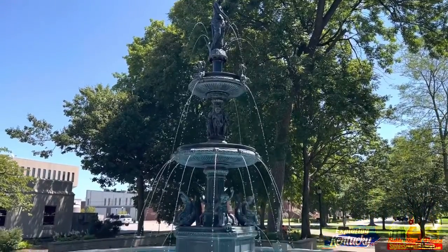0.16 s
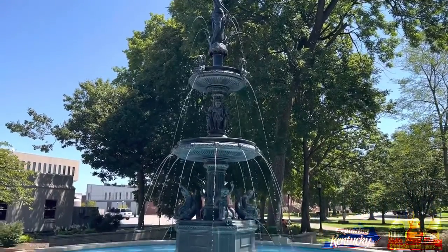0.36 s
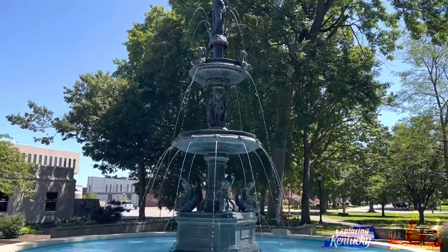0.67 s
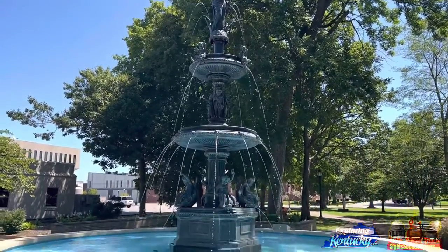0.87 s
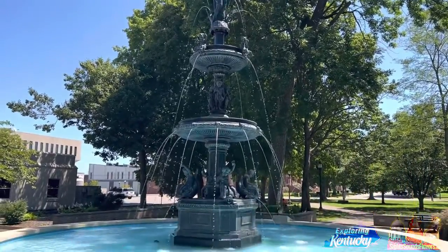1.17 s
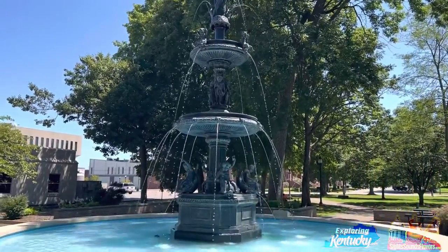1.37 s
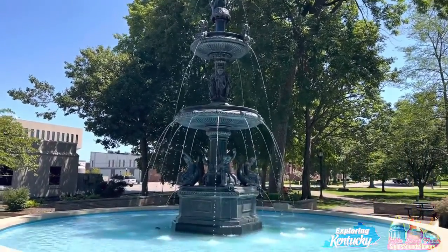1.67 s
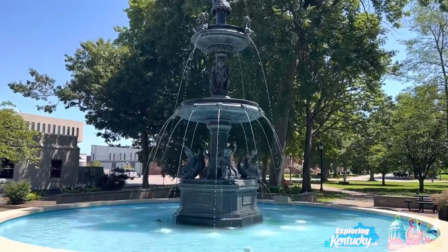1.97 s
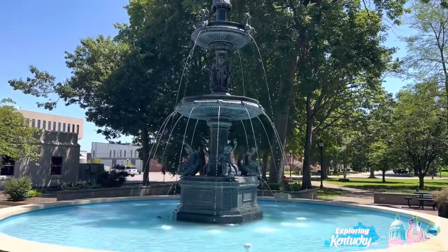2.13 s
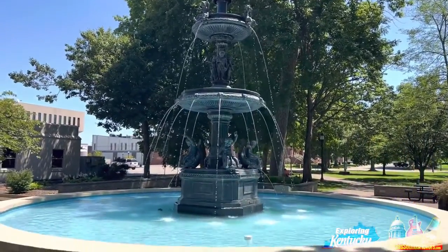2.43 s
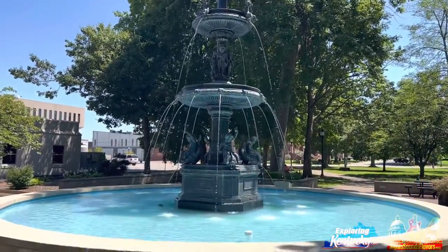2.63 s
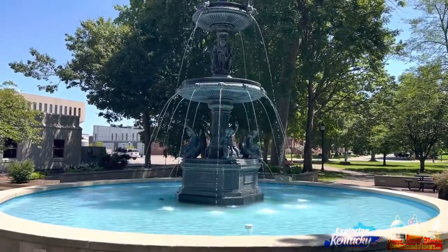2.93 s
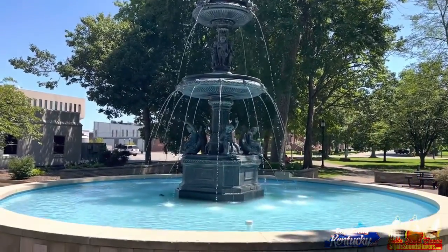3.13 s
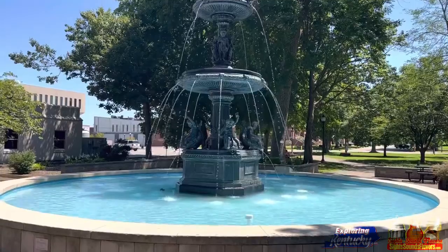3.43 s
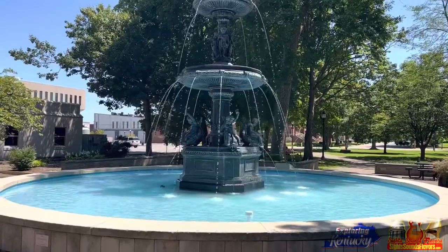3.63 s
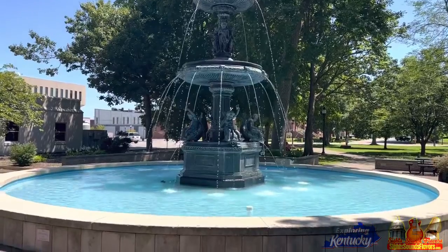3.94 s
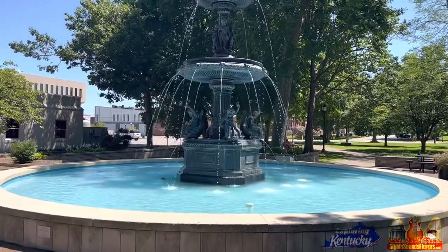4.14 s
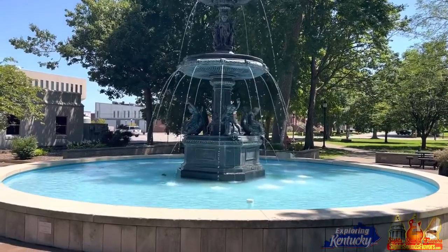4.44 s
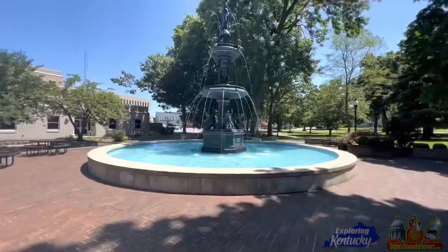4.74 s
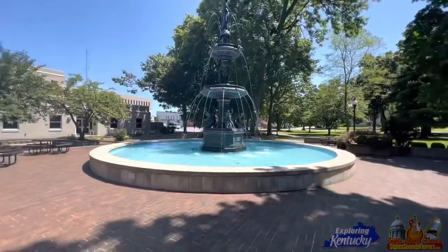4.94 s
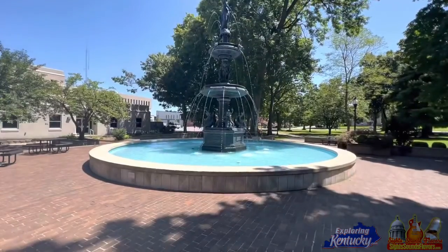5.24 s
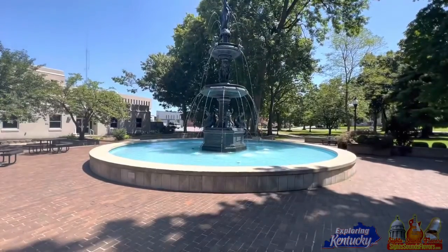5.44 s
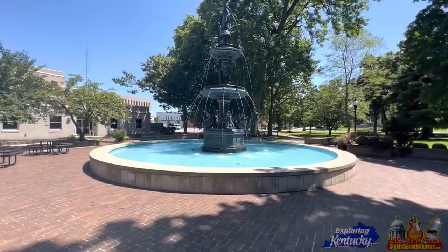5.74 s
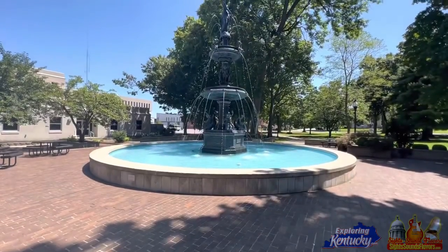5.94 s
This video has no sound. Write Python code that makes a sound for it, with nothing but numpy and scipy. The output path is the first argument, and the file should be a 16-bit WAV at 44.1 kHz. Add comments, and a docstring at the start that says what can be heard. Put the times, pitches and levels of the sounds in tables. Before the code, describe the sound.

Thin fountain jets splash steadily into a pool, with plops and droplet patter, over a low traffic rumble and a distant engine drone.

```python
"""A park with a tiered fountain, on two microphones: first at the rim, then farther back on the brick plaza.
Thin jets break into slugs that slap into the pool: noise ticks, ringing bubbles and a noise wash.
Single slaps, droplet showers and clumps of water stand out, each built from noise or damped sines.
Filtered noise rumbles as street traffic, an engine and then a fainter motor drone as sine tones,
and a bird chips once, a swept whistle with a short echo."""
import sys
import numpy as np
from scipy import signal
from scipy.fft import rfft, irfft, next_fast_len
from scipy.io import wavfile
from scipy.ndimage import uniform_filter1d, map_coordinates

SR = 44100
rng = np.random.default_rng(int(sys.argv[2]) if len(sys.argv) > 2 else 0)


def materialize(psi):
    """Save the field psi as 16-bit PCM at rate SR to the path in sys.argv[1].

    A 1-D psi becomes a single channel; in a 2-D psi each row is a channel.
    """
    bounded = np.clip(np.atleast_2d(psi).T, -1, 1)
    quanta = np.round(bounded * 32767).astype(np.int16)
    wavfile.write(sys.argv[1], SR, quanta)


N = 269010


def amp(db):
    """Decibels to gain."""
    return 10 ** (np.asarray(db) / 20)


def unit(x):
    """Scale to rms 1."""
    return x / np.sqrt(np.mean(x ** 2) + 1e-20)


def along(points, hz):
    """Each column of a table by frequency, read on a log axis."""
    f, *cols = np.transpose(points)
    return [np.interp(np.log(hz + 1), np.log(f + 1), c) for c in cols]


def curves(rows):
    """One value per sample for each column after the time."""
    s, *cols = np.transpose(rows)
    return [np.interp(np.arange(N) / SR, s, c) for c in cols]


def wobble(rate):
    """A smooth random curve of rms 1, with rate knots a second."""
    knots = rng.standard_normal(int(N * rate / SR) + 4)
    return unit(map_coordinates(knots, [np.arange(N) * rate / SR]))


def swell(full_s, leave_s, rise_db_per_s, fall_db_per_s):
    """Attack, hold and release, in dB below the held level."""
    t = np.arange(N) / SR
    return -rise_db_per_s * np.maximum(full_s - t, 0) - fall_db_per_s * np.maximum(t - leave_s, 0)


def filtered(x, response):
    """x times a complex response of frequency."""
    m = next_fast_len(N + SR // 4)
    return irfft(rfft(x, m) * response(np.fft.rfftfreq(m, 1 / SR)), m)[..., :N]


def above(hz, edge_hz):
    """Gain of a gentle high-pass."""
    return hz ** 2 / np.sqrt(hz ** 4 + edge_hz ** 4)


def place(times, grains):
    """Sum rows of grains, each starting at its time in seconds."""
    start = (np.asarray(times) * SR).astype(int)[:, None] % N
    index = start + np.arange(grains.shape[1])
    return np.bincount(index.ravel(), grains.ravel(), N)[:N]


def to_both(x, left_db):
    """Left and right microphone, one raised and the other lowered by left_db."""
    return amp([[left_db], [-left_db]]) * x


def impacts(times, sizes, life_s):
    """Each drop is a sharp noise tick that dies within a millisecond or so."""
    t = np.arange(SR // 400) / SR
    ticks = rng.standard_normal((len(times), len(t))) * np.exp(-t / life_s)
    return unit(place(times, sizes[:, None] * ticks))


def bubbles(times, sizes, centre_hz, spread, cycles, rise):
    """Trapped air rings briefly, and its pitch climbs as it nears the surface."""
    t = np.arange(SR // 40) / SR
    chance = rng.standard_normal((len(times), 2))
    hz = centre_hz * np.exp(spread * 2 * np.tanh(chance[:, :1] / 2))
    life = np.minimum(cycles * np.exp(.5 * chance[:, 1:]) / hz, t[-1] / 4)
    phase = 2 * np.pi * hz * (t + rise * t ** 2 / (2 * life))
    rings = np.sqrt(hz / life) * np.sin(phase) * np.exp(-t / life)
    return unit(place(times, sizes[:, None] * rings))


def patchy(x, depth_db, size):
    """Random swells a few hundred Hz wide and some 30 ms long, as single jets waver."""
    z = signal.stft(x, nperseg=512, noverlap=384)[2]
    field = rng.standard_normal(z.shape)
    for axis in (0, 1):  # smooth over frequency bins, then over time frames
        field = uniform_filter1d(field, size[axis], axis=axis)
    return signal.istft(z * amp(depth_db * unit(field)), nperseg=512, noverlap=384)[1][:N]


def splashing(count=1800, slug_db=2.5, drop_db=4.0, scatter_s=.003):
    """Slugs land at random; each breaks into a clump of drops and bubbles over the wash of distant ones."""
    # the pump's steady flow keeps the count even
    slug_s = (np.arange(count) + rng.uniform(-2, 2, count)) * N / SR / count
    slug = amp(slug_db * np.minimum(rng.standard_normal(count), 2))

    def fragments(size):
        """Times and gains of the pieces that each slug breaks into."""
        times = np.repeat(slug_s, size) + scatter_s * rng.exponential(1, count * size)
        gains = amp(drop_db * np.minimum(rng.standard_normal(count * size), 2))
        return times, np.repeat(slug, size) * gains

    ticks = impacts(*fragments(size=4), life_s=0.00056)
    ticks = filtered(ticks, lambda hz: .5 + .5 * above(hz, 1030))  # small drops carry little bass
    plops = bubbles(*fragments(size=2), centre_hz=1183, spread=0.467, cycles=1.93, rise=0.061)
    rings = bubbles(*fragments(size=3), centre_hz=3200, spread=.8, cycles=10, rise=.02)
    wash = unit(rng.standard_normal(N) * amp(0.78 * wobble(90)))
    water = amp(-5) * ticks + amp(-7.5) * rings + amp(-12) * plops + amp(2) * wash
    return patchy(water, depth_db=.9, size=(5, 11))


def heard_from(fields, colour, image, bounce_s, bounce_db=-15):
    """Two unrelated sheets of splashing, coloured, shared between the microphones and echoed by a surface."""
    def weights(hz):
        """Gain of each sheet (second axis) into each microphone (first axis)."""
        balance_db, alike, lead = along(image, hz)
        turn = np.arccos(np.clip(alike, -1, 1)) / 2  # mixing angle that gives this likeness
        mics = np.array([amp(balance_db / 2), amp(-balance_db / 2) * np.exp(-1j * lead)])
        reflected = amp(bounce_db) * above(hz, 2000) / (1 + (hz / 8000) ** 8)
        comb = 1 + reflected * np.exp(-2j * np.pi * np.outer(bounce_s, hz))
        mics = colour(hz) * comb * mics / np.linalg.norm(mics, axis=0)
        mix = np.array([[np.cos(turn), np.sin(turn)], [np.cos(turn), -np.sin(turn)]])
        return mics[:, None] * mix

    pair = filtered(fields, weights).sum(axis=1)
    return pair / np.std(pair.mean(axis=0))


# Colour of the falling water from each place.
# Each row: frequency in Hz, relative level in dB at the rim, relative level in dB from the plaza.
WATER_COLOUR = [(25, -31, -35), (89.5, -4, -9), (254, -3.5, -3.5), (375, -5, -8), (477, -5, -6),
                (638, -1.5, -0.9), (777, -0.1, 0), (840, -5.5, -9.5), (1120, -1.5, -0.5), (1292, -4.5, 1),
                (1350, -7, -8), (1520, -4, -8), (1684, -1.6, 3), (1860, -5.5, -5), (2120, -1.6, -3),
                (2410, -8.5, -4), (2490, -3, -2.5), (2780, -8.5, -7), (3500, -9.5, -7.5), (4030, -12, -10),
                (4160, -13.5, -12), (7000, -17.5, -15), (7560, -18.5, -13.7), (8450, -17.5, -18),
                (12300, -22, -21), (13000, -25, -29), (15700, -30, -33)]
# How the water spreads over the two microphones at the rim, and then on the plaza.
# Each row: frequency in Hz, left-right balance in dB, likeness from -1 to 1, left lead in radians.
RIM_SPREAD = [(300, 0.9, 0.92, 0.0), (1100, 1.9, 0.88, 0.1), (2000, 0.4, 0.71, 0.2), (2800, 2.9, 0.3, 1.0),
              (3900, 1.4, 0.58, 0.5), (4800, 2.2, 0.25, -0.1), (6000, 7.3, 0.14, -0.6),
              (7500, 3.3, 0.2, 0.5), (8600, 0.2, 0.82, -0.1), (10100, 0.1, 0.97, -3.1),
              (12000, -0.0, 0.97, -6.3), (13800, -0.0, 0.96, -9.4), (15400, 0.0, 0.91, -12.6)]
PLAZA_SPREAD = [(300, 1.7, 0.82, 0.0), (1100, 3.9, 0.58, 0.2), (2000, 4.5, 0.51, 0.2), (2800, 5.6, -0.1, 0),
                (3900, 2.9, 0.46, 0.5), (4800, 3.6, -0.24, 0), (6000, 10.1, -0.15, 0),
                (7500, 8.9, 0.16, 0.1), (8600, 4.4, 0.11, 0.6), (10100, 0.5, 0.52, -3.0),
                (12000, -0.0, 0.97, -6.3), (13800, -0.1, 0.58, -9.4), (15400, -0.5, 0.79, -12.6)]
# A nearby surface returns the splashing about 2 ms late, at the rim and then on the plaza.
# Each pair: left delay in seconds, right delay in seconds.
RIM_BOUNCE_S = (.002108, .00182)
PLAZA_BOUNCE_S = (.002204, .001964)
# Treble spray against the water's colour. Each row: time in seconds, mean level in dB.
SPRAY_LEVEL = [(0, 0.8), (0.22, 1.5), (0.9, 0.5), (1.1, 1.5), (1.4, 1), (3.35, 0.2), (4.55, 0.7), (4.8, 2),
               (5.25, 1.5), (5.45, 3), (5.6, 2), (6.1, 2.5)]


def fountain(rim_db=-34.5, plaza_db=-35, step_back_s=4.63, hollow_db=-15, low_bounce_s=0.00213):
    """The pump runs steadily, so the splashing has one level at each place: the rim, then the plaza."""
    bright_db, = curves(SPRAY_LEVEL)
    fields = np.array([splashing(), splashing()])

    def rim_colour(hz):
        return amp(along(WATER_COLOUR, hz)[0])

    def plaza_colour(hz):
        # on the plaza the same roughly 2 ms bounce also hollows the low and middle range
        turn = np.exp(1j * (np.pi / 2 - 2 * np.pi * hz * low_bounce_s))
        hollow = 1 + amp(hollow_db) * (1 - above(hz, 2900)) * turn
        return amp(along(WATER_COLOUR, hz)[1]) * hollow

    rim = heard_from(fields, rim_colour, RIM_SPREAD, RIM_BOUNCE_S)
    plaza = heard_from(fields, plaza_colour, PLAZA_SPREAD, PLAZA_BOUNCE_S)
    far = np.clip((np.arange(N) / SR - step_back_s) / 0.0091, 0, 1)  # a 9 ms crossfade
    water = (1 - far) * amp(rim_db) * rim + far * amp(plaza_db) * plaza
    spray = filtered(water, lambda hz: above(hz, 3300))
    flutter_db = .5 * wobble(17)  # the light spray drifts in the air
    return water - spray + amp(bright_db + flutter_db) * spray


# Colour of the traffic rumble. Each row: frequency in Hz, relative level in dB per Hz.
ROAD_COLOUR = [(13, -58), (22, -20), (37, -11), (65, 5), (80, -3.5), (97, -3), (151, 1.5), (169, 0),
               (205, -12.5), (330, -21.5), (430, -52), (730, -120)]


def street(held_db=-37.5, uneven_db=1.0):
    """Low traffic noise behind, wide around 75 Hz and nearly alike in both microphones elsewhere."""
    # the traffic swells, holds and recedes
    road_db = held_db + swell(full_s=1.0, leave_s=3.6, rise_db_per_s=1.5, fall_db_per_s=1)
    road_db = road_db + uneven_db * wobble(7)
    noise = rng.standard_normal((2, N))
    mid, side = unit(filtered(noise, lambda hz: amp(along(ROAD_COLOUR, hz)[0])))
    width = [(40, -17), (75, -1.5), (120, -18.5), (300, -10.0)]  # Hz, side level in dB
    side = filtered(side, lambda hz: amp(along(width, hz)[0]))
    return amp(road_db) * (mid + np.array([side, -side]))


# Heavy slugs that stand out.
# Each row: start in seconds, cavity level in dB before its envelope and low cut, cavity pitch in Hz,
# cycles until the ring falls to 1/e, spray level in dB relative to the cavity before the wet_db boost.
HEAVY_SLUGS = [(0.190, -21, 2250, 2.2, -16), (0.293, -26.5, 605, 1.8, -20), (0.762, -23.5, 1530, 2.4, -10),
               (0.822, -19, 1510, 1.7, -25), (1.187, -24, 1800, 2.2, -20), (1.25, -21.5, 2200, 5, -13),
               (1.283, -20, 1520, 2.7, -20), (1.29, -25, 2100, 1.1, -13), (1.317, -14, 2530, 2.2, -17),
               (1.369, -19, 2200, 2.5, -18), (1.399, -23, 1130, 2.5, -20), (1.734, -23, 1400, 2, -14),
               (1.869, -23.5, 745, 2, -22), (1.884, -20.5, 2300, 2, -9), (2.054, -21, 2140, 2.2, -12),
               (2.418, -21, 1300, 2.2, -12), (2.435, -24, 770, 2.2, -19), (2.509, -20.5, 2750, 2.5, -7.5),
               (2.512, -27, 620, 2.3, -25), (2.595, -21, 1360, 2.7, -17), (3.016, -21, 1590, 1.5, -19),
               (3.167, -26.5, 3820, 3, -13), (3.190, -21.5, 1770, 2, -11), (3.335, -14.5, 720, 1.4, -32),
               (3.383, -24, 1130, 2.5, -22), (3.530, -25, 790, 2, -16), (3.591, -33, 662, 1.8, -22),
               (3.688, -18, 1700, 1.7, -12), (3.755, -19.5, 2730, 3, -10), (3.796, -22, 1230, 2, -8),
               (3.827, -23, 1300, 2, -12), (3.921, -19.5, 3400, 2.5, -6), (3.93, -24, 2900, 2.5, -9),
               (4.115, -18, 1620, 1.6, -18), (4.1866, -16, 1500, 1, -15), (4.1948, -15, 2010, 1.5, -12),
               (4.751, -18.5, 3600, 1.6, -24), (4.833, -29, 1000, 2, -18), (4.873, -23.5, 1750, 1.7, -6),
               (4.954, -25, 1660, 3.2, -20), (5.139, -22.5, 3600, 3, -9), (5.156, -19, 1710, 1.2, -11),
               (5.557, -26.5, 673, 2, -14), (5.892, -22, 1850, 2.6, -9), (6.0378, -18.5, 2700, 1.8, -6),
               (6.042, -24, 2300, 3, -13)]


def slaps(crack_db=-7.0, crack_s=0.00045, thrown_s=0.0014, spray_s=0.012, wet_db=7):
    """A heavy slug cracks on the surface, its cavity plops, and noisy spray falls after it."""
    s, db, hz, cycles, spray_db = np.transpose(HEAVY_SLUGS)[:, :, None]
    t = np.arange(SR // 16) / SR
    opening = 1 - np.exp(-8 * t * hz)  # the cavity opens within its first cycle
    cavity = opening * np.sin(2 * np.pi * hz * t) * np.exp(-t * hz / cycles)
    cavity = signal.lfilter(*signal.butter(2, 450, "high", fs=SR), cavity)
    crack = amp(crack_db) * np.exp(-t / crack_s) * rng.standard_normal(cavity.shape)
    crack = signal.lfilter(*signal.butter(2, [900, 4500], "band", fs=SR), crack)
    falling = (1 - np.exp(-t / thrown_s)) * np.exp(-t / spray_s)
    spray = amp(spray_db + wet_db) * falling * rng.standard_normal(cavity.shape)
    spray = signal.lfilter(*signal.butter(3, [1100, 3400], "band", fs=SR), spray)
    return to_both(place(s[:, 0], amp(db) * (cavity + crack + spray)), left_db=1.0)


# Showers of fine droplets close by. Each row: start in seconds, droplet level in dB before colouring.
DROPLET_SHOWERS = [(0.212, -33), (0.46, -39), (1.052, -34), (1.13, -32), (1.752, -37), (2.416, -30),
                   (2.455, -31), (2.75, -30), (3.66, -30), (3.921, -26.5), (3.94, -28), (4.19, -29),
                   (4.236, -34)]


def showers(rise_s=0.0045, count=120):
    """Thrown droplets patter down close by: bright clicks, sized separately at each microphone."""
    s, db = np.transpose(DROPLET_SHOWERS)
    times = (s[:, None] + rise_s * rng.gamma(2, 1, (len(s), count))).ravel()
    sizes = np.repeat(amp(db), count)[:, None]
    pair = np.array([place(times, sizes * rng.standard_normal((len(times), 1))) for mic in range(2)])
    colour = [(500, -50), (2500, -12), (6000, 1.5), (11000, -5.5), (15000, -21)]  # Hz, dB
    return filtered(pair, lambda hz: amp(along(colour, hz)[0]))


# A distant engine takes up the load, eases off and pulls again.
# Each row: time in seconds, mean level in dB of the firing rate, mean level in dB of the octave.
ENGINE_LOAD = [(0.45, -66, -75), (0.77, -38, -59), (0.95, -50, -38), (1.25, -38, -41), (1.37, -53, -51),
               (1.5, -42, -49), (1.8, -38.5, -46), (2.05, -38.5, -46), (2.45, -47, -57), (3.0, -37.5, -54),
               (3.3, -68, -75), (3.6, -100, -100)]


def engine(firing_hz=49.1, gain_hz_per_s=0.625, pull_start_s=0.73, unsteady=.01, waver_db=1.0):
    """A distant engine's unsteady drone, slowly gaining speed: its firing rate and the octave above."""
    hz = firing_hz + gain_hz_per_s * (np.arange(N) / SR - pull_start_s)
    phase = 2 * np.pi * np.cumsum(hz * (1 + unsteady * wobble(5.56))) / SR
    first_db, second_db = curves(ENGINE_LOAD)
    drone = np.sqrt(2) * (amp(first_db) * np.sin(phase) + amp(second_db) * np.sin(2 * phase))
    return amp(waver_db * wobble(8.8)) * drone


# A jet wavers and dumps a clump of water.
# Each row: time at its height in seconds, level in dB before halving, centre frequency in Hz.
WATER_CLUMPS = [(0.785, -37.5, 2090), (0.87, -37, 1700), (1.06, -39, 1500), (1.215, -42, 1600),
                (1.31, -36.5, 1500), (2.02, -38, 1510), (2.099, -40, 2100), (2.69, -45, 1400),
                (3.075, -41, 2780), (3.21, -42, 2500), (3.42, -43, 1600), (3.775, -41, 2490),
                (4.03, -39, 750), (4.31, -41, 1600), (4.665, -37, 2110), (5.06, -46, 1600),
                (5.33, -42, 1900), (5.449, -39, 2000), (5.569, -36.5, 1500), (5.815, -36, 1990)]


def clumps(rise_s=.006, life_s=0.00048, drop_db=4, octaves=.75, count=40):
    """Dozens of drops land together: their summed envelope shapes band-limited noise into a gurgle."""
    out = np.zeros(N + SR)
    t = np.arange(SR // 10) / SR
    hz = np.fft.rfftfreq(len(t), 1 / SR)
    for s, db, centre_hz in WATER_CLUMPS:
        age = t - rise_s * rng.gamma(4, 1, (count, 1))
        sizes = amp(drop_db * rng.standard_normal((count, 1)))
        drops = sizes * (age > 0) * np.exp(-np.abs(age) / life_s)
        patter = np.linalg.norm(drops, axis=0) * rng.standard_normal(len(t))
        band = np.exp(-.5 * (np.log2((hz + 1) / centre_hz) / octaves) ** 2)
        splash = unit(irfft(rfft(patter) * band, len(t)))
        start = int((s - 4 * rise_s) * SR)  # the drops land 4 * rise_s later on average
        out[start:][:len(t)] += .5 * amp(db) * splash
    return to_both(out[:N], left_db=1.0)


def hum(tone_hz=78.1, held_db=-48.5, unsteady=0.0066):
    """A second, fainter motor in the traffic: one slightly unsteady low tone that comes and goes."""
    phase = 2 * np.pi * np.cumsum(tone_hz * (1 + unsteady * wobble(5.4))) / SR
    level_db = held_db + swell(full_s=2.8, leave_s=4.8, rise_db_per_s=40, fall_db_per_s=40)
    return np.sqrt(2) * amp(level_db) * np.sin(phase)


# A small bird's upward chip in the trees.
# Each row: time in seconds, mean pitch in Hz, level in dB before flutter and left-right balance.
BIRD_CHIP = [(5.385, 4600, -65), (5.395, 5600, -41), (5.401, 7300, -46), (5.408, 7600, -38),
             (5.414, 7650, -52), (5.425, 7500, -65)]


def bird(flutter_db=3.0, echo_db=-5, echo_s=.04, quaver=.015):
    """One thin whistle that sweeps up and holds, with a short echo from the trees."""
    hz, db = curves(BIRD_CHIP)
    t = np.arange(N) / SR
    singing = (t > BIRD_CHIP[0][0]) & (t < BIRD_CHIP[-1][0])
    phase = 2 * np.pi * np.cumsum(hz * (1 + quaver * wobble(400))) / SR
    chip = singing * amp(db + flutter_db * wobble(300)) * np.sqrt(2) * np.sin(phase)
    tail = rng.standard_normal((2, SR // 4)) * np.exp(-t[:SR // 4] / echo_s)
    echo = signal.fftconvolve(chip[None], tail / np.linalg.norm(tail[0]), axes=1)[:, :N]
    return to_both(chip + amp(echo_db) * echo, left_db=5.0)


def scene():
    """Water in front, the trees and the street behind."""
    water = fountain() + slaps() + showers() + clumps()
    return water + street() + engine() + hum() + bird()


def record(dry):
    """The recorder keeps nothing above its band limit of 15.83 kHz."""
    return filtered(dry, lambda hz: hz < 15830)


dry = scene()
out = record(dry)
materialize(out)
```